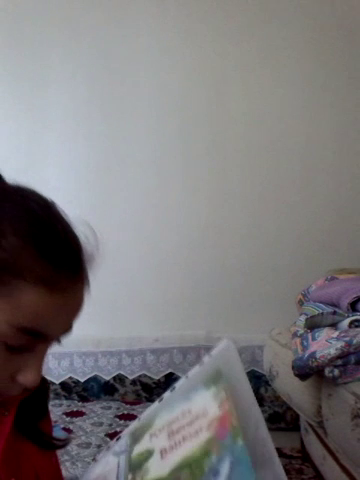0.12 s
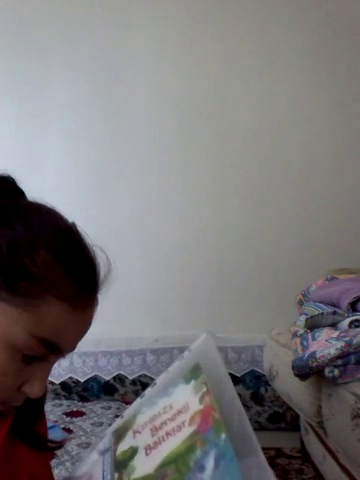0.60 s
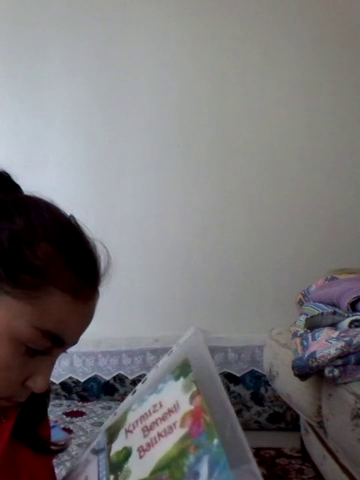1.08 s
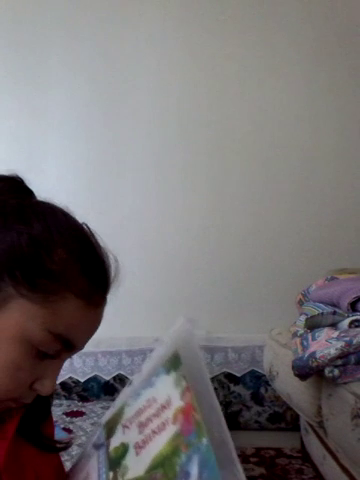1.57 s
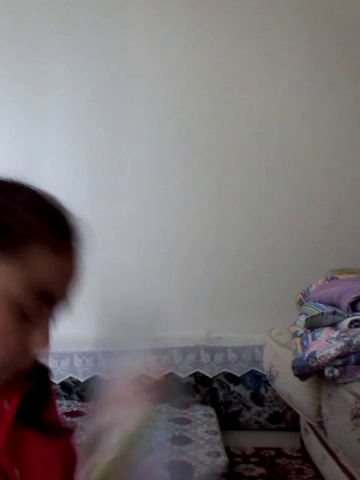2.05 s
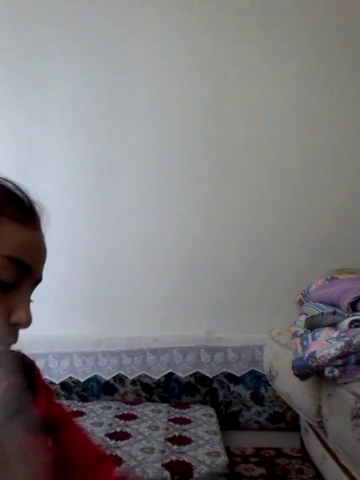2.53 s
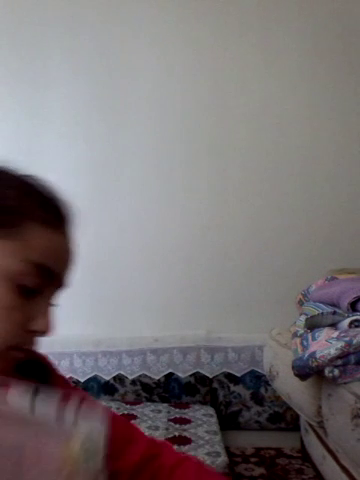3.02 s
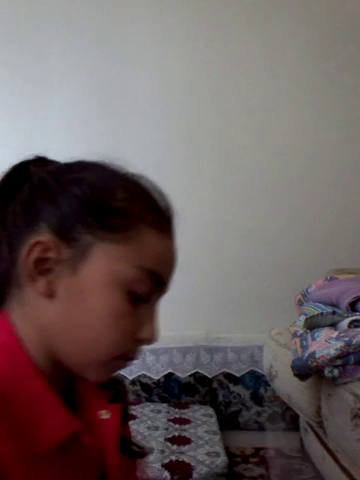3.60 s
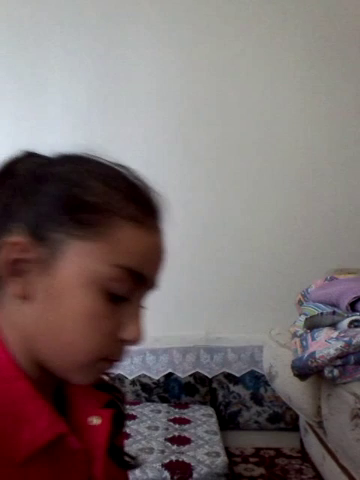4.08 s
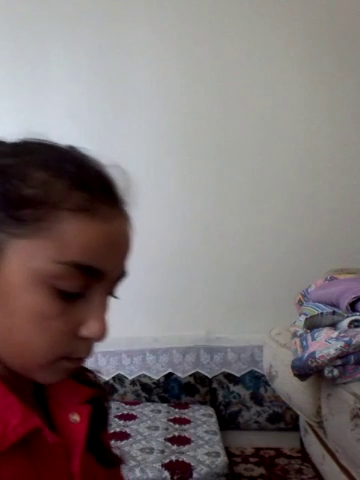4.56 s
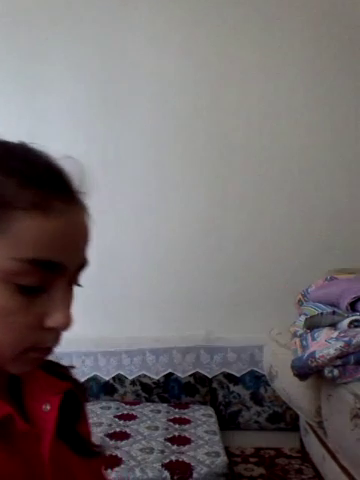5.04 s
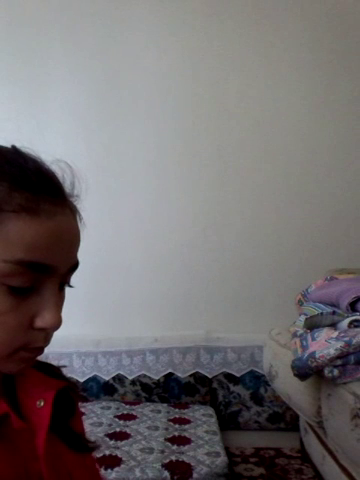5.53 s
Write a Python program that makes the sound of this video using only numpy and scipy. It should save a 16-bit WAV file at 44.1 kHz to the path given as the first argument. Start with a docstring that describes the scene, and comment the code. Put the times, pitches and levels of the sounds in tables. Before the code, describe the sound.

In a small, lightly echoing bedroom, thin stiff plastic folders are handled close to a two-port phone microphone. A crease snaps right at the start with a fading rustle, then sparse small clicks and faint crinkles, with one firmer snap near 0.9 s. From 1.5 s cracks cluster and rustling swells, with a very loud crack around 2.1 s and more snaps near 2.55 s. At 3.0 s a short, soft low thud sets the stack down; a hard crack follows at 3.24 s. Dense bright crinkling, hollow with flexing, peaks around 3.7 s and continues past 4.2 s with sharp snaps. Brief singing rubs between 4.3 and 4.55 s lead to a quick ratchet of bright ticks. Smaller crackles and rustles around 5.0 to 5.4 s thin out to the end at about 5.6 s. Soft hiss and a wavering low hum run throughout; the right side rings brighter.

```python
"""Thin plastic folders are bent, turned and stacked in a small bedroom, near a phone with two microphone ports.
A crease snaps at once, then sparse snaps and faint crinkling lead to a loud run of cracks from 1.5 s.
A low thud at 3 s sets the stack down; denser crinkling follows, then singing rubs and bright ticks near 4.5 s.
Snaps and slips are decaying noise bursts, flexing adds a resonance, and wall echoes answer, strongest at 14 ms.
Room tone and a low hum run throughout; the right port rings near 5.6 kHz and has the opposite polarity."""
import sys
import numpy as np
from scipy import signal
from scipy.fft import rfft, irfft, next_fast_len
from scipy.io import wavfile

SR = 44100
rng = np.random.default_rng(int(sys.argv[2]) if len(sys.argv) > 2 else 0)


def ratio_of_db(decibels):
    """Turn decibels (scalar or array-like) into linear amplitude factors; 0 dB maps to 1."""
    return 10 ** (np.asarray(decibels, float) / 20)


def file_out(sig):
    """Save sig as 16-bit WAV at sys.argv[1]."""
    # one column per channel
    cols = np.atleast_2d(sig).T
    # limit, then scale
    lim = np.clip(cols, -1, 1)
    pcm = np.round(lim * 32767).astype(np.int16)
    wavfile.write(sys.argv[1], SR, pcm)


N = 248283

TICK_HZ = 7080  # where the treble ticks and hiss begin
# hollow resonance of a bent folder: f/Hz, width/Hz, boost/dB
SHEET_RESONANCE = (1330, 300, 7)


def snaps():
    """Impulsive buckling: a crease cracks briefly, knocks the sheet longer and duller, and ticks on top."""
    # creases letting go: t/s, nominal peak level/dB, body level re peak/dB, treble tick level re peak/dB
    creases = [(0.014, -17, -10, -41), (0.3427, -34.5, -19, -39), (0.442, -32, -30, -36),
               (0.4705, -33.5, -27, -26), (0.5213, -34.5, -20, -44), (0.5616, -30, -28, -44),
               (0.5726, -49.5, 7.5, -35), (0.6995, -35, -6, -47), (0.757, -51, 0.5, -40),
               (0.9394, -17.5, -16.5, -39), (1.126, -43, -11, -47), (1.4685, -36, -5.5, -37),
               (1.5358, -25, -17.5, -27), (1.544, -23, -14.5, -20), (1.58, -15.5, -13, -22.5),
               (1.585, -15, -17, -31), (1.619, -27, -31, -23), (1.716, -40, 0.5, -35),
               (1.7354, -23.5, -26, -25), (1.876, -34, -13, -26), (2.003, -13, -12.5, -35),
               (2.1291, -2.5, -21, -39), (2.18, -9.5, -19, -34), (2.3365, -30.5, -22, -28),
               (2.372, -28, -10.5, -52), (2.5137, -32.5, -12, -24), (2.5487, -15, -22.5, -34),
               (2.578, -11.5, -14.5, -44), (2.5799, -15, -13, -37), (2.886, -48, -3, -35),
               (2.973, -43, -5, -28), (3.138, -29.5, -23, -29), (3.1515, -25, -18, -46),
               (3.162, -23.5, -14.5, -50), (3.1953, -37, -0.5, -40), (3.2398, -5, -23, -51),
               (3.2903, -21, -9.5, -31), (3.292, -18.5, -22.5, -34), (3.298, -19, -19.5, -37),
               (3.3096, -26.5, -18, -23), (3.363, -37.5, -35, -23), (3.581, -36, -23, -32.5),
               (3.6022, -33.5, -12.5, -27), (3.6621, -20, -4, -22), (3.6698, -4.5, -16, -33),
               (3.6764, -28, -10, -30), (3.6881, -24, -12.5, -19), (3.763, -32, -20, -16),
               (3.779, -39, -20, -24), (3.7983, -35, 4.5, -12), (3.8204, -32, -7.5, -10.5),
               (3.833, -16.5, -17, -24), (3.932, -28, -2, -47), (4.05, -43.5, -2.5, -35),
               (4.0937, -34, -24, -9.5), (4.1194, -18, -24.5, -21), (4.1789, -10.5, -18.5, -29.5),
               (4.1846, -23.5, -12, -15.5), (4.4097, -17, -11, -50), (4.728, -43.5, -16, -10.5),
               (5.017, -31, -10, -26), (5.062, -38.5, -3, -22), (5.1295, -28, -6, -37),
               (5.3125, -27.5, -12, -28.5), (5.3218, -28, -14, -43), (5.567, -39.5, -23, -10)]
    # an edge catches and slips in a run of like, bright ticks: t/s
    ratchet_times = [4.549, 4.554, 4.5605, 4.5725, 4.587, 4.598]
    # every such tick: nominal peak level/dB, body level re peak/dB, treble tick level re peak/dB
    ratchet_levels = (-30, -20, -12)
    body_hz = 2146
    teeth = [(s, *ratchet_levels) for s in ratchet_times]
    s, peak_db, body_db, tick_db = np.transpose(creases + teeth)
    moments = np.round(s * SR).astype(int)

    def spikes(db):
        return np.bincount(moments, ratio_of_db(db), N)

    crack = bursts(spikes(peak_db + 3), t60=0.008, alike=0.13, lead=3.5)
    crack = band(crack, [0.8 * body_hz, TICK_HZ], "bandpass")
    knock = bursts(spikes(peak_db + body_db + 16.5), t60=0.021, alike=1.0, lead=4.35)
    knock = band(knock, [200, body_hz], "bandpass")
    knock = filtered(knock, lambda f: 1 + ring(f, *SHEET_RESONANCE))
    tick = bursts(spikes(peak_db + tick_db + 27.5), t60=0.014, alike=0.053, lead=1.5)
    tick = band(tick, TICK_HZ, "highpass")
    return crack + tick + knock


def rustle():
    """Stick-slip noise: dense film slips hiss high; sparser, duller ones excite a wandering resonance."""
    # the hollow ring as a flexed sheet opens and closes: f/Hz
    bend_hz = [1000, 1300, 1600]
    crinkle, treble, flexing = strokes()
    slips = bursts(grains(per_second=1800, spread_db=5.2), t60=0.012, alike=0.45, lead=0)
    film = crinkle * unit(band(slips, [4000, TICK_HZ], "bandpass"))
    film += ratio_of_db(6.5) * treble * unit(band(slips, TICK_HZ, "highpass"))

    dull_slips = bursts(grains(per_second=1400, spread_db=7.0), t60=0.034, alike=0.69, lead=0)
    flex = unit(band(dull_slips, 1850, "lowpass"))
    # a slow random position along bend_hz, crossfading neighbouring resonances
    bend = 1 + unit(band(rng.standard_normal(N), 6, "lowpass")).clip(-1, 1)
    hollow = 0
    for k, hz in enumerate(bend_hz):
        share = (1 - abs(bend - k)).clip(0)
        hollow = hollow + share * filtered(flex, lambda f: ring(f, hz, *SHEET_RESONANCE[1:]))
    return ratio_of_db(-4.5) * film + flexing * (flex + hollow)


def strokes():
    """Envelopes of hand strokes, adding in power: an exponential swell and decay shared by three layers."""
    # strokes of the hands over the folders: peak t/s, length/s, nominal crinkle level/dB,
    # flexing level re crinkle/dB, treble level re crinkle/dB
    hand_strokes = [(0.002, 0.47, -48, -1.5, 0), (0.371, 0.077, -50.5, -13, -3),
                    (1.281, 0.14, -55, 1.5, -10), (1.497, 0.18, -43, -2.5, -6.5),
                    (1.605, 0.043, -33, -19, -7.5), (1.899, 0.58, -51.5, -7, 3.5),
                    (2.048, 0.25, -34.5, -3.5, -2), (2.195, 0.31, -38.5, -2, -4),
                    (2.52, 0.228, -42.5, -7, -4), (2.598, 0.2, -41.5, -0.5, -7),
                    (2.724, 0.14, -39, -5.5, 1.5), (2.941, 0.34, -40, -8, -1), (3.012, 0.14, -38, -10, 2),
                    (3.19, 0.29, -44, -1, -9), (3.516, 0.15, -36.5, -7, -0.5), (3.71, 0.17, -29.5, -0.5, 0),
                    (3.833, 0.44, -33, -7.5, -0.5), (4.153, .16, -36, -7.5, -13),
                    (4.372, 0.25, -31, -6.5, -2.5), (4.53, 0.26, -41.5, -1, 3), (4.662, 0.33, -45, -1, -3),
                    (4.914, 0.62, -44, -3.5, 0), (5.015, 0.057, -30.5, -8, -5), (5.133, 0.196, -33, -6, -2),
                    (5.308, 0.038, -35, -8, -7), (5.373, 0.39, -43, -7.5, -0.5),
                    (5.555, 0.12, -39, -4.5, -4.5)]
    # sheets barely held: nominal crinkle level/dB, flexing level re crinkle/dB, treble level re crinkle/dB
    resting = (-76, -19, -21)
    fall_db, rise_share = 28.5, 0.67  # drop over one length after the peak; the rise takes this share of it
    t = np.arange(N) / SR

    def layers(db, flex_db, treble_db):
        return ratio_of_db(db + np.array([[0], [treble_db], [flex_db]]))

    power = layers(*resting) ** 2 * np.ones(N)
    for s, length, *levels in hand_strokes:
        away = np.maximum(t - s, (s - t) / rise_share) / length
        power = power + (layers(*levels) * ratio_of_db(-fall_db * away)) ** 2
    return np.sqrt(power)


def bursts(sizes, t60, alike, lead):
    """Exponentially decaying scattering, partly coherent between ports; rows are left, right, room."""
    fade = ratio_of_db(-60 / (t60 * SR))
    envelope = signal.lfilter([1], [1, -fade], sizes)
    shared, own = np.sign(rng.standard_normal((2, N)))
    right_chatter = alike * shared + np.sqrt(1 - alike ** 2) * own
    first_pulse = lead * sizes * shared
    left = envelope * shared + first_pulse
    right = envelope * right_chatter + first_pulse
    # the room takes the energy of the chatter from all sides, evenly coloured
    to_room = sizes * shared / np.sqrt(1 - fade ** 2)
    return np.array([left, right, to_room])


def grains(per_second, spread_db):
    """Random point process: tiny slips at random moments, a few much larger than the rest."""
    chance, size = rng.random(N), rng.exponential(1, N)
    return (chance < per_second / SR) * ratio_of_db(np.minimum(spread_db * size, 18))


def rub():
    """Friction-driven resonance: noise sings in an air pocket, its pitch gliding as that closes or opens."""
    # pockets of air between sliding sheets: start t/s, length/s, first f/Hz, last f/Hz,
    # cutoff of the flutter f/Hz, nominal starting level/dB
    pockets = [(.698, .065, 1250, 1300, 300, -44), (4.325, .07, 610, 860, 50, -36),
               (4.43, .045, 1300, 1220, 70, -33), (4.485, .07, 1090, 1020, 70, -38)]
    ramp_s, sag_db = 0.012, 7  # rise and release time; level lost along the rub
    t, song = np.arange(N) / SR, np.zeros(N)
    for s, length, first_hz, last_hz, width_hz, db in pockets:
        done = np.clip((t - s) / length, 0, 1)
        ramps = np.clip(np.minimum(t - s, s + length - t) / ramp_s, 0, 1)
        shape = ramps * ratio_of_db(db - sag_db * done)
        flutter = unit(band(rng.standard_normal(N), width_hz, "lowpass"))
        pitch_hz = first_hz + (last_hz - first_hz) * done
        song += shape * flutter * np.cos(2 * np.pi * np.cumsum(pitch_hz) / SR)
    return song


def thud():
    """Damped free vibration: a short low knock as the stack is set down."""
    # the knock: t/s, f/Hz, t60/s, nominal level/dB
    knock = (3, 442, 0.0156, -22.5)
    s, hz, t60, db = knock
    t = (np.arange(N) / SR - s).clip(0)
    return ratio_of_db(db - 60 * t / t60) * np.sin(2 * np.pi * hz * t)


def echo(length):
    """Room impulse response: silence, wall reflections, then a tail that dies faster in the treble."""
    # reverberation of the tail: f/Hz, t60/s
    decay = [(300, 0.59), (800, 0.41), (2000, 0.35), (5500, 0.29), (12000, 0.16)]
    # first reflections: t/s, relative level/dB
    walls = [(.0085, -2), (0.014, 0.5), (0.017, -5.5)]
    t = np.arange(length) / SR
    noise = rng.standard_normal((3, length))
    # long waves reach both ports alike
    noise = band(noise[0], 490, "lowpass") + band(noise[1:], 756, "highpass")
    hz, frames, z = signal.stft(noise, SR, nperseg=256)
    z = z * ratio_of_db(-60 * frames / along(decay, hz)[:, None])
    tail = signal.istft(z, SR, nperseg=256)[1][:, :length]
    # each reflection is a burst falling 60 dB in 25 ms
    arrivals = sum(ratio_of_db(db - 60 * (t - s).clip(0) / 0.025) * (t > s) for s, db in walls)
    thickening = np.clip((t - 0.011) / 0.016, 0, 1)
    tail = tail * (1.267 * arrivals + thickening)
    return tail / np.linalg.norm(tail[0])


def room(x):
    """Time-varying convolution: the sheets keep moving, so the response changes every quarter second."""
    step, length = SR // 4, SR // 2
    wet = np.zeros((2, N + step + length))
    for start in range(0, N, step):
        part = signal.fftconvolve(x[None, start:start + step], echo(length), axes=1)
        wet[:, start:start + part.shape[1]] += part
    return wet[:, :N]


def rumble():
    """Low-passed level modulation of band noise: a dull hum, different at each port, swells and sinks."""
    # the low hum of the house: t/s, nominal level/dB
    house_hum = [(0, -64), (3.6, -65), (4.2, -71), (5.63, -67)]
    wander_db = 3 * unit(band(rng.standard_normal(N), 5, "lowpass"))  # rms 3 dB, below about 5 Hz
    upper = unit(band(rng.standard_normal((2, N)), [95, 220], "bandpass"))
    lower = unit(band(rng.standard_normal((2, N)), [30, 95], "bandpass"))
    return ratio_of_db(curves(house_hum)[0] + wander_db) * (upper + ratio_of_db(-9.5) * lower)


def hush():
    """Diffuse-field coherence: steady room tone is only a little alike at the two ports."""
    # colour of the room tone: f/Hz, relative level/dB
    colour = [(25, -13), (100, -2.5), (380, 1), (750, -5.5), (1250, -7.5), (2000, -12.5), (3100, -16),
              (6000, -12.5), (9500, -16), (14000, -13.5)]
    # coherence of the ports: f/Hz, likeness (0 to 1)
    likeness = [(60, 0.15), (500, 0.238), (1500, 0.086)]

    def mid_side(hz):
        turn = np.arccos(np.clip(along(likeness, hz), -1, 1)) / 2
        return ratio_of_db(along(colour, hz)) * [np.cos(turn), np.sin(turn)]

    mid, side = filtered(rng.standard_normal((2, N)), mid_side)
    return ratio_of_db(-57.0) * unit(np.array([mid + side, mid - side]))


def ring(f, hz, width, db):
    """Second-order resonance: the extra complex response of one mode."""
    return (ratio_of_db(db) - 1) * 1j * f * width / (hz * hz - f * f + 1j * f * width)


def band(x, hz, kind):
    """Causal Butterworth filtering: a low-, band- or high-pass."""
    return signal.sosfilt(signal.butter(3, hz, kind, fs=SR, output="sos"), x)


def filtered(x, response):
    """Convolution theorem: the spectrum of x times a complex response of frequency."""
    m = next_fast_len(N + 8192)
    return irfft(rfft(x, m) * response(np.fft.rfftfreq(m, 1 / SR)), m)[..., :N]


def unit(x):
    """Power normalisation: x at rms 1."""
    return x / np.sqrt(np.mean(x ** 2) + 1e-20)


def along(points, hz):
    """Logarithmic frequency scale: (f, value) points interpolated at hz."""
    f, v = np.transpose(points)
    return np.interp(np.log(hz + 1), np.log(f + 1), v)


def curves(rows):
    """Linear interpolation in time: one value per sample for each column after t/s."""
    s, *cols = np.transpose(rows)
    return [np.interp(np.arange(N) / SR, s, c) for c in cols]


def scene():
    """Superposition of the direct sound of the sheets, their echo, the room tone and the hum."""
    # where the sheets are: t/s, left level re right/dB, echo send level/dB
    place = [(0, -0.5, -5.5), (2.6, -0.5, -4.5), (3.24, 2, -11), (3.6, -1.5, -2), (4.5, 1.5, -1),
             (5.63, -1, 1)]
    # colour of the plastic film: f/Hz, level/dB
    film_colour = [(150, -11), (420, -4.5), (800, -6.5), (1500, -9.5), (3000, -1.5), (5500, 0.5),
                   (7500, -6.5), (10000, -10.5), (13500, -17.5)]
    sheets = filtered(snaps() + rustle() + rub() + thud(), lambda hz: ratio_of_db(along(film_colour, hz)))
    pan_db, echo_db = curves(place)
    near = sheets[:2] * ratio_of_db(np.array([pan_db / 2, -pan_db / 2]))
    # the left port is farther
    delay_s = np.array([[0.00023], [0]])
    near = filtered(near, lambda hz: np.exp(-2j * np.pi * hz * delay_s))
    return near + room(ratio_of_db(echo_db) * sheets[2]) + hush() + rumble()


def band_limit(x):
    """A steep low-pass at the top of the band."""
    return signal.sosfilt(signal.butter(12, 15720, fs=SR, output="sos"), x)


def record(dry):
    """Cavity resonance and polarity reversal at the right port; a steep treble cut, then clipping."""
    # modes of the right port's cavity: f/Hz, width/Hz, boost/dB
    port_modes = [(5536, 780, 9), (1200, 6000, 3)]
    # the minus sign: its capsule is wired the other way round
    right = filtered(dry[1], lambda f: -(1 + sum(ring(f, *mode) for mode in port_modes)))
    x = np.array([dry[0], right])
    x = filtered(x, lambda hz: 1 / (1 + (hz / 14600) ** 70))
    mix = np.clip(x, -1, 1)
    return band_limit(mix)


dry = scene()
out = record(dry)
file_out(out)
```